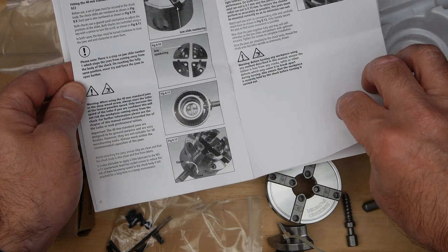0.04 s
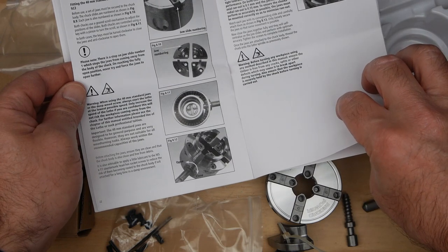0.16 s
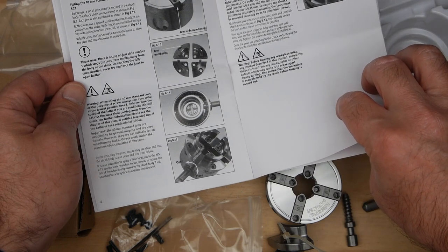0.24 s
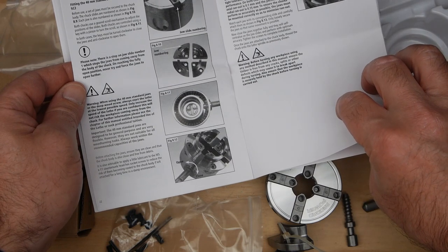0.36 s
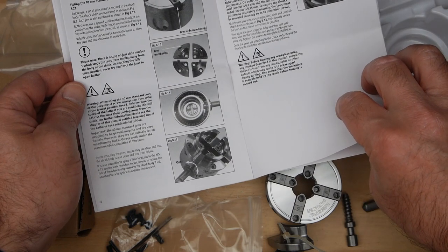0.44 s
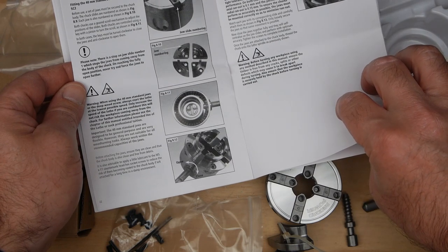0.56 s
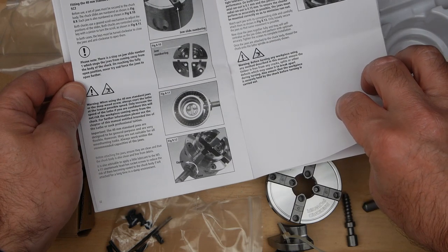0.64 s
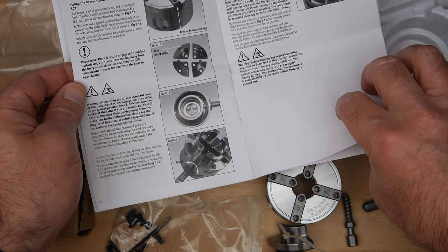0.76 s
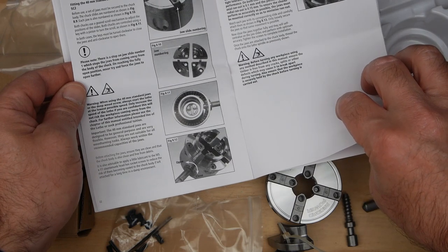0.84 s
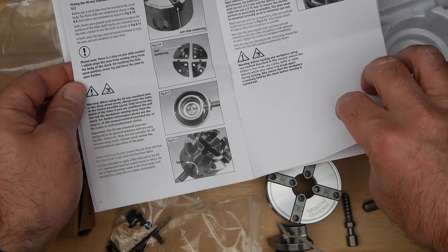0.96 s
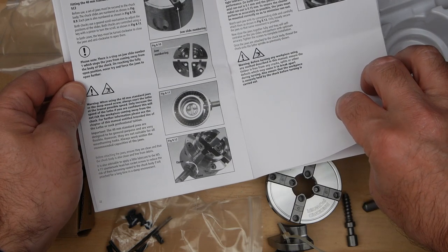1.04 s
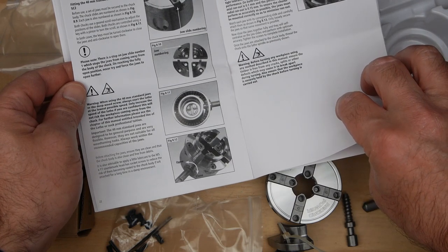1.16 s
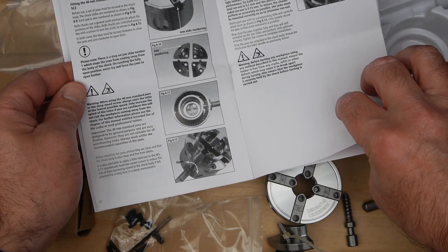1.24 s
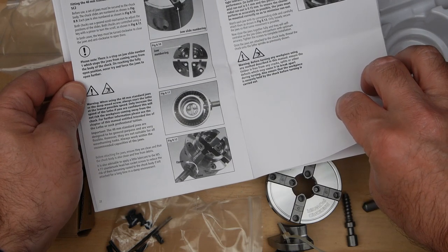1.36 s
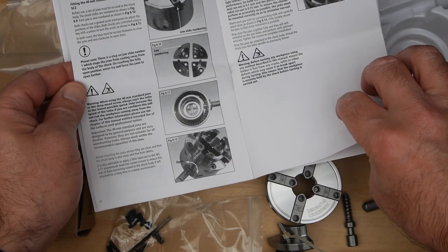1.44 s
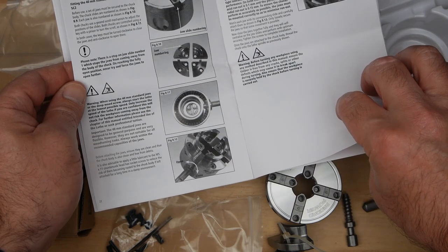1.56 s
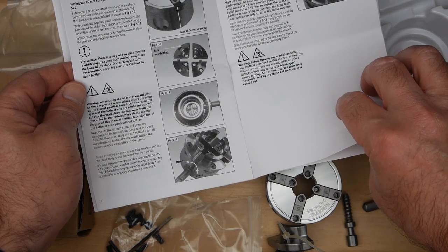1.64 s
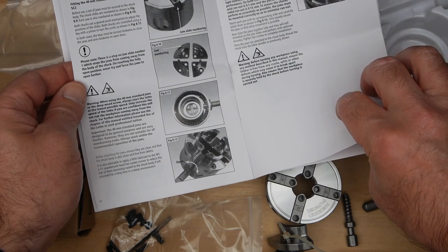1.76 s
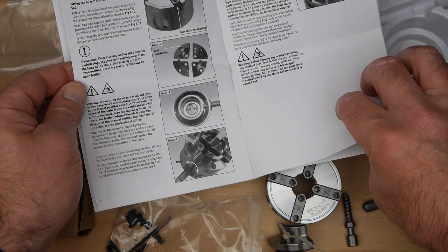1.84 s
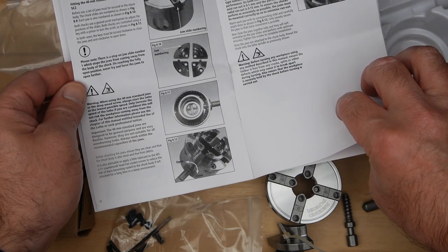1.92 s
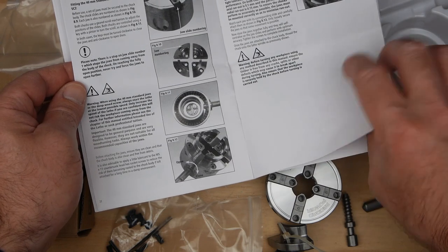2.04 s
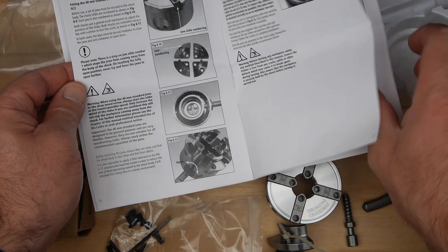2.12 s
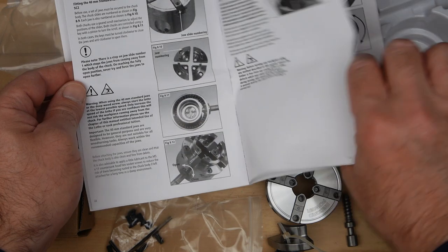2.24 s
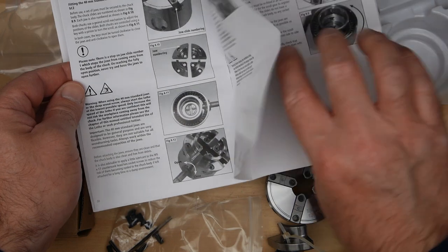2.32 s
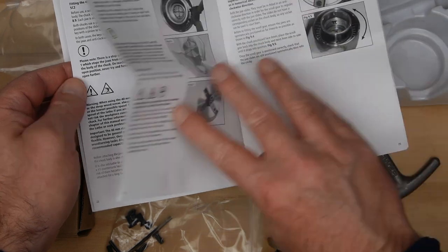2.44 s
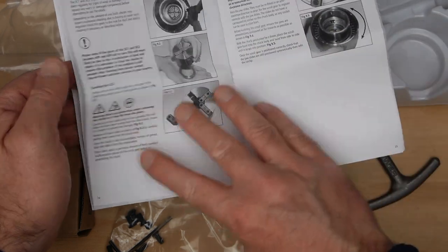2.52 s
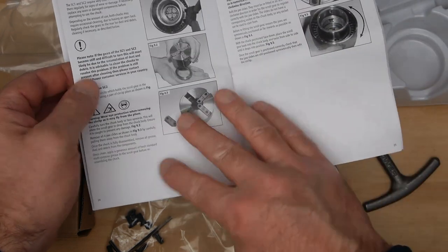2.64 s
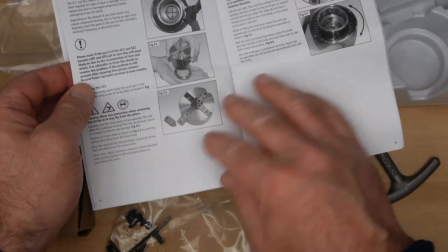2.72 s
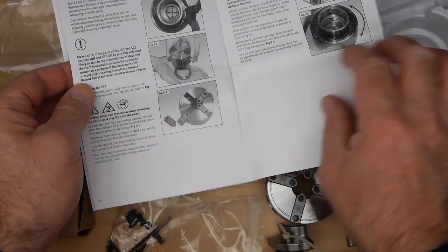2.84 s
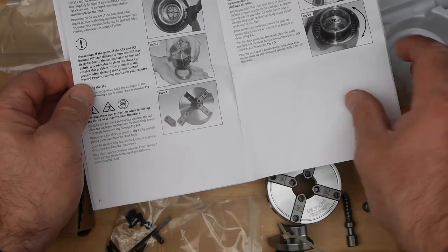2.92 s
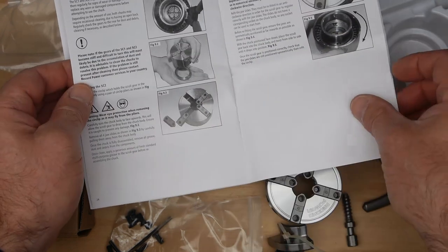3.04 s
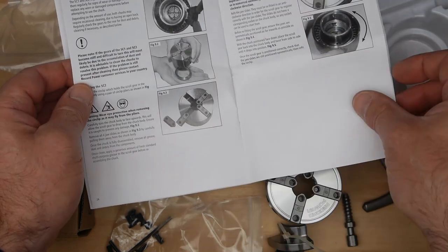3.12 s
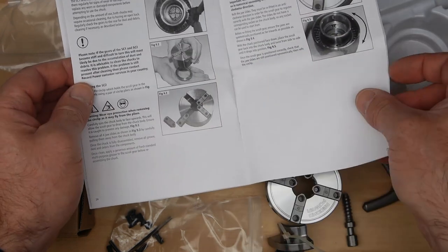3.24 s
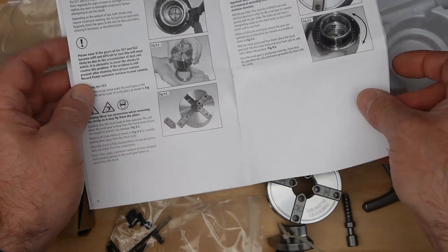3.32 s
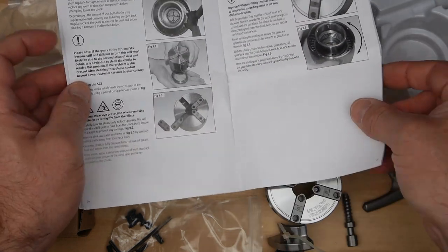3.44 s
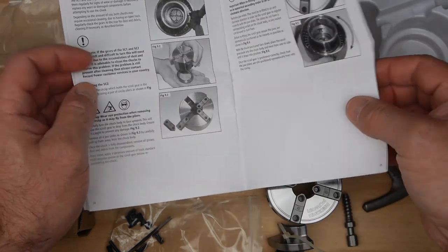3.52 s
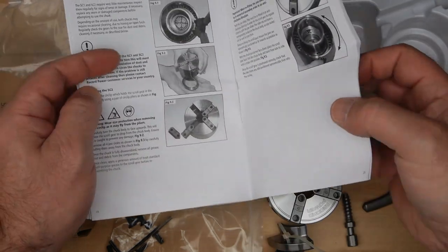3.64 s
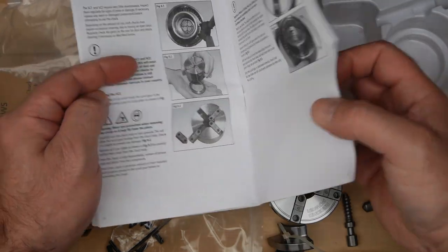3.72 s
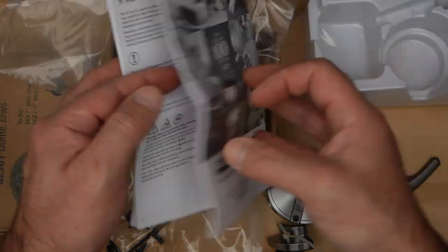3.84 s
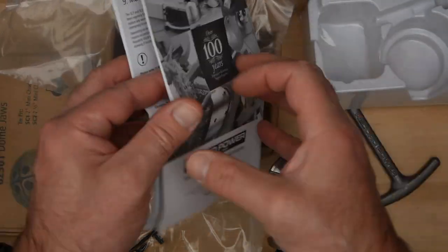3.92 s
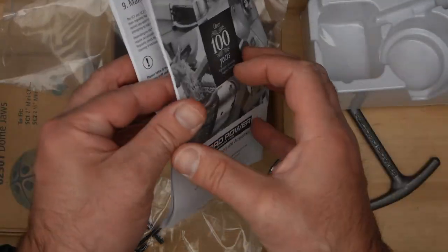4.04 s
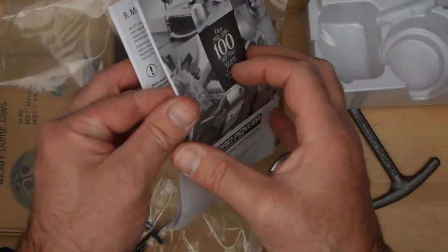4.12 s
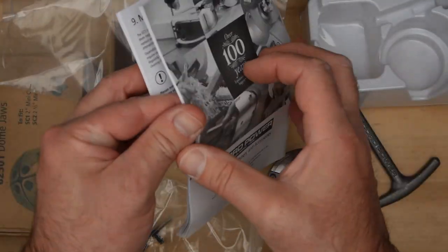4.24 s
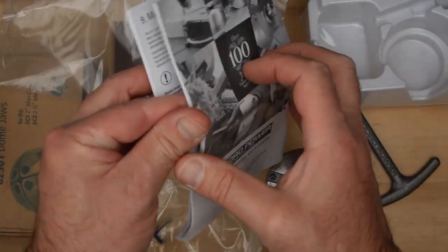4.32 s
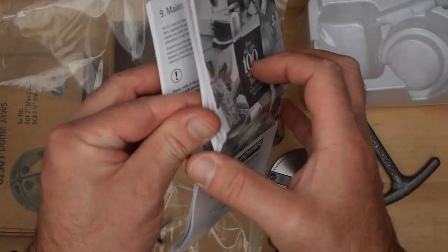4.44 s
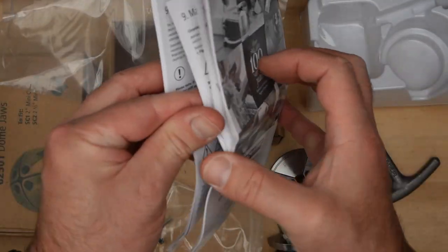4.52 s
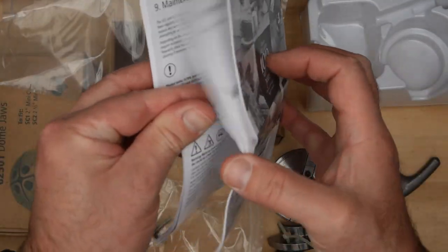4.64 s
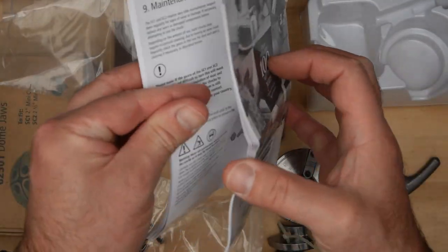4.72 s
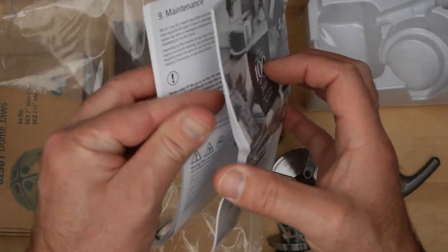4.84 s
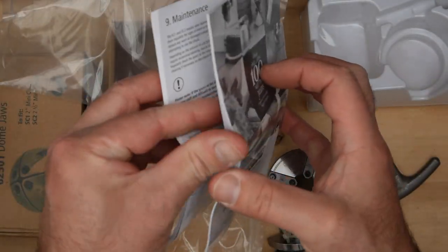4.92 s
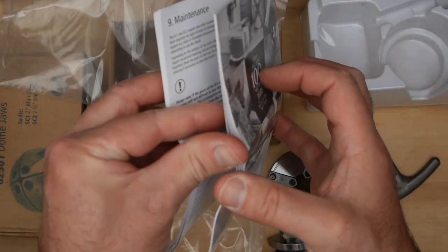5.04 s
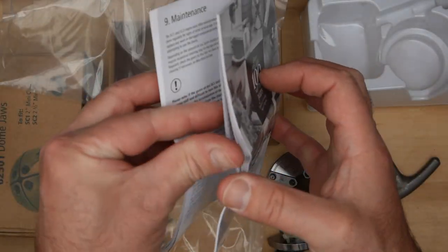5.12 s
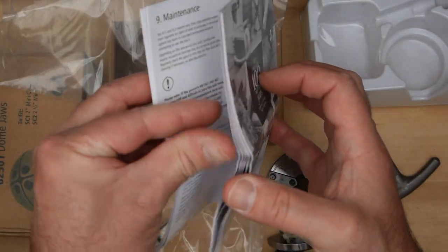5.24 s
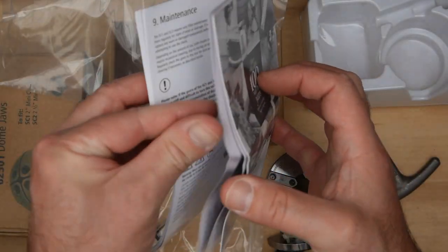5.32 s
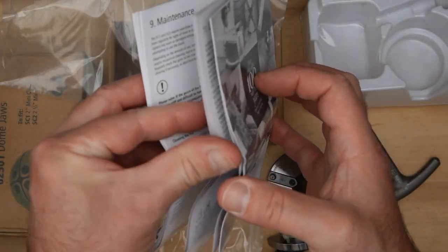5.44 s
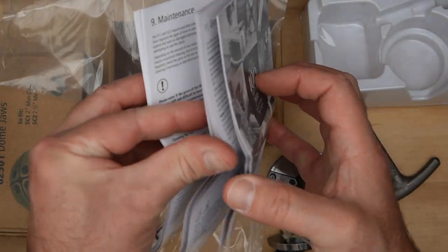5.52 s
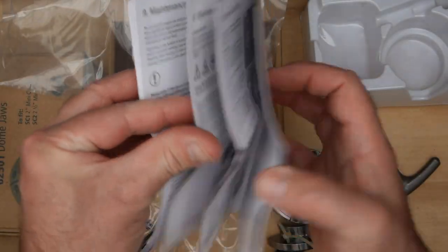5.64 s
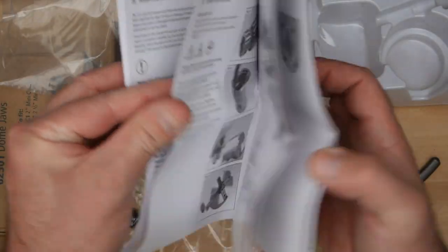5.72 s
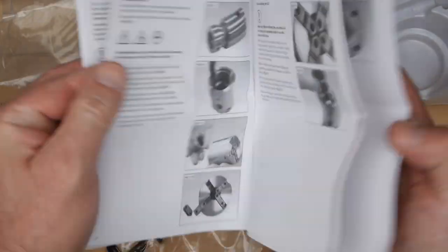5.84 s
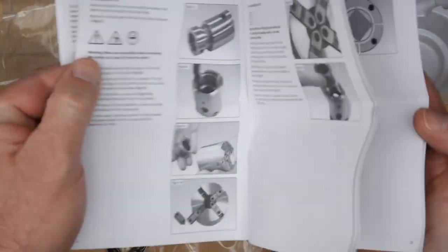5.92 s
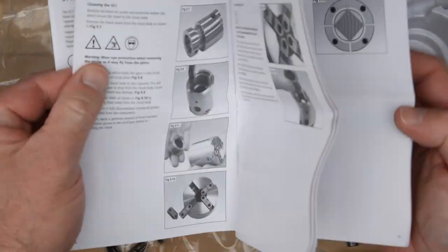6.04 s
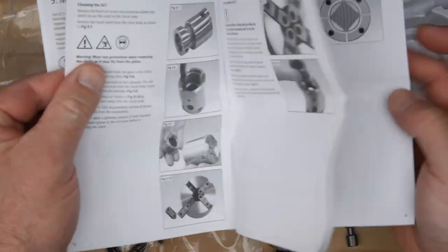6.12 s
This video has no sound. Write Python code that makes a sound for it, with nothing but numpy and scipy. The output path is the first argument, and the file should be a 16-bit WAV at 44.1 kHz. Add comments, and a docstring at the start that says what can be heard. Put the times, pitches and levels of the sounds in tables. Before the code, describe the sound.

Quiet indoor hum and air; a thin booklet's page snaps over loudly, fingers brush it, pages close and riffle softly, ending in a sharp flick.

```python
"""A mains hum, steady air noise and a faint fluttering whine come first; after two seconds the paper starts.
In a small, quiet room two hands leaf through a paper booklet over a workbench.
One page is swung over and smoothed down, fingers slide to the edge, the booklet is shut, riffled and opened.
Creases are filtered kicks and bursts; edges, skin and bending are random grains shaped by hand strokes.
The microphone gets the paper directly and by way of bench and walls, in stereo, with a notch in the treble."""
import sys
import numpy as np
from scipy import signal
from scipy.fft import rfft, irfft
from scipy.io import wavfile
from scipy.ndimage import uniform_filter1d

SR = 44100
rng = np.random.default_rng(int(sys.argv[2]) if len(sys.argv) > 2 else 0)


def put_to_file(sound):
    """Save the sound as 16-bit audio at rate SR, in the file named by the first command-line argument."""
    columns = np.atleast_2d(sound).T  # one column per channel
    safe = np.clip(columns, -1, 1)
    whole_steps = np.round(safe * 32767)
    wavfile.write(sys.argv[1], SR, whole_steps.astype(np.int16))


N = 272538
TIME = np.arange(N) / SR
HZ = np.arange(2049) * SR / 4096  # the frequencies at which every filter gain is given


# A sheet buckles or an edge flicks free: (time [s], relative level [dB], low flex [dB re level],
# high crack [dB re level], ring [Hz], rise [s])
SNAPS = [(2.239, -28.5, -5, -32, 1530, 0.0034), (2.303, -60, 16, 9, 894, 0.0077),
         (2.331, -40.5, 7.5, 3.5, 566, 0.0056), (2.348, -24, -5, -14.5, 3420, 0.00098),
         (2.362, -27.5, -26, -26, 1260, 0.0036), (2.391, -28, -14, -23, 860, 0),
         (2.398, -22.5, -3.5, -24, 1940, .003), (2.404, -28, 2, -6.5, 920, 0.0012),
         (2.420, -23.5, 4, -12, 1500, 0.0029), (2.431, -23, -6.5, -7, 6100, 0.0018),
         (2.4341, -30, -12, -25, 1280, .0003), (2.485, -38, 5, -7, 1290, 0.0026),
         (2.528, -37, 2, -10, 1830, 0.0016), (2.621, -43, 5.5, 2.5, 520, 0.0025),
         (2.655, -51, 3.5, 9.5, 6440, 0.001), (2.755, -45, -4.5, 0.5, 2000, 0.0018),
         (2.932, -65, 5, 9.5, 1590, 0.0045), (3.040, -59, 4, -2, 1660, 0.0024),
         (3.3, -53.5, 18.5, 1.5, 880, 0.0016), (3.405, -54.5, 6, -2, 520, 0.0074),
         (3.443, -58, 14, 0.5, 464, 0.0033), (3.568, -54, 15.5, -19, 760, 0.0026),
         (3.747, -66, 24.5, -3, 570, 0.0037), (3.911, -52, -7, 9.5, 2930, 0.00014),
         (3.922, -45, 3.5, 2.5, 3350, .0015), (3.989, -44, -1, -6.5, 1640, 0.0025),
         (4.014, -41.5, -3, -15, 1600, 0.0018), (4.07, -46, -14, -21, 1560, .001),
         (4.086, -48.5, -4, -9, 3600, 0.000081), (4.179, -53.5, -1, -2, 1610, 0.0028),
         (4.2304, -47.5, -7.5, -22, 1560, 0.00063), (4.2763, -51, 2.5, -22, 1520, 0.000049),
         (4.449, -52, -7, -2, 2230, 0.0065), (4.482, -50, -15, -7, 2050, 0.0023),
         (4.539, -57.5, 9.5, -14, 2080, 0.003), (4.578, -44, -6, -28, 1980, 0.0026),
         (4.611, -46, 3.5, 8.5, 4840, 0.00081), (4.644, -60.5, 7, 22, 4680, 0.0012),
         (4.671, -42, -1.5, -10, 2580, 0.005), (4.753, -36, -30, -19, 2570, .004),
         (4.765, -38, -14, 2.5, 7200, 0.0031), (5.153, -50, -9.5, -26, 1290, 0),
         (5.224, -57, -3, 8, 2150, .0013), (5.2621, -50.5, 4, 8, 6100, 0.0017),
         (5.735, -59.5, -2, -4.5, 2570, 0.00007), (5.869, -56.5, -14, 6, 2800, 0.0033),
         (5.919, -40, -23, 6, 2570, 0.0036), (5.9698, -56.5, -5, 10.5, 2393, 0.0023),
         (6.002, -44, -1, 0.5, 2430, 0.0026), (6.060, -67, 8, 13, 4100, 0),
         (6.105, -27.5, -35, -31, 4400, 0.00039), (6.1109, -30, -6.5, -40, 2100, 0.0023),
         (6.1191, -32, 0.5, -42, 1420, .0035)]


def snaps(level_db=24, flex_db=-1, crack_db=0, ring_width=0.19, chatter=1.0, kick_s=0.0042):
    """A crease pops through with one kick and chatters briefly; a slow release is a swish without the kick."""
    out = np.zeros(N)
    t = np.arange(4096) / SR
    flex_band = resonance(HZ, 523, 1070) ** 2
    body_band = resonance(HZ, 2060, 3260) ** 3
    crack_band = resonance(HZ, 5000, 9400) ** 3
    sheet = sheet_gain() / np.hypot(1, (HZ / 8470) ** 4)
    for s, db, flex, crack, ring_hz, rise_s in SNAPS:
        # smaller snaps, and dull ones with little crack, ring more purely
        ring_db = 9.5 + 0.12 * (-25 - db) + 0.11 * np.clip(-crack, 0, 20)
        # the size of the patch that pops decides where it rings
        ring_peak = resonance(HZ, ring_hz, ring_width * ring_hz) ** 2
        ring = sheet * (1 + (undb(ring_db) - 1) * ring_peak)
        levels = undb(db) * undb([flex + flex_db, 0, crack + crack_db])
        bands = [flex_band, body_band, crack_band]
        gain = np.sqrt(sum((g * unit(band * ring)) ** 2 for g, band in zip(levels, bands)))

        # a crease that lets go slowly also chatters longer; the fade time is to -60 dB
        fade_s = max(0.014 + 4.1 * rise_s, .002)
        onset = np.minimum((t + 1 / SR) / max(rise_s, 1 / SR), 1)
        fade = np.exp(-np.log(1000) * np.maximum(t - 2 * rise_s, 0) / fade_s)
        push = rng.standard_normal(len(t)) * onset * fade
        push *= chatter / np.linalg.norm(push)
        push[0] = rng.choice([-1, 1]) * np.exp(-rise_s / kick_s)  # the kick
        add(out, s, undb(level_db) * shape(push / np.linalg.norm(push), gain))
    return out


# The whole bundle of pages bumps against the hands: (time [s], peak level [dB], pitch [Hz])
BUMPS = [(2.310, -36.5, 197), (2.345, -39, 350), (2.412, -42, 130), (2.44, -28.5, 340), (3.107, -42.5, 454),
         (3.957, -32.5, 327), (3.97, -40, 260), (4.004, -40.5, 148), (4.019, -35, 300), (4.177, -43.5, 270),
         (4.753, -51, 430), (6.12, -45.5, 170)]


def bumps(fade_s=0.038, breadth=1.47):
    """Soft, heavily damped thuds of the whole bundle: fading noise in a broad resonance."""
    out = np.zeros(N)
    t = np.arange(4096) / SR
    # the deepest bass is kept out of the thuds
    low_cut = 1 / np.hypot(1, (80 / (HZ + 1)) ** 3)
    for s, db, hz in BUMPS:
        push = rng.standard_normal(len(t)) * np.exp(-np.log(1000) * t / fade_s)
        thud = shape(push, resonance(HZ, hz, breadth * hz) ** 3 * low_cut)
        add(out, s, undb(db) * thud / abs(thud).max())
    return out


# Paper slides on paper: (time of fastest moment [s], level [dB], swell [s], fade [s])
# 2.2-2.7 s page turned and smoothed, to 4.1 s booklet shut, 4.4-4.8 s first riffle,
# 5.1-5.5 s second riffle, from 5.9 s opened again
SLIDES = [(2.235, -52, 0.083, 0.071), (2.41, -35, 0.069, 0.069), (2.53, -51.5, 0.16, 0.23),
          (2.65, -46.5, 0.12, 0.048), (2.79, -60.5, 0.099, 0.11), (3.92, -51, 0.16, 0.19),
          (4.06, -52.5, 0.2, 0.3), (4.48, -48.5, 0.052, 0.055), (4.68, -45.5, 0.16, 0.21),
          (4.76, -42.5, .075, 0.063), (5.13, -59.5, 0.17, 0.19), (5.28, -52, 0.093, 0.16),
          (5.45, -60.5, .07, 0.11), (5.95, -51.5, 0.2, 0.31), (6.13, -52.5, 0.095, 0.18)]
# Colour of the scrape: (frequency [Hz], relative level [dB])
SLIDE_COLOUR = [(100, -34), (250, -7.5), (420, 4.5), (600, -5.5), (1250, -0.5), (1800, -2.5), (2500, -1),
                (3600, -2.5), (5500, -7), (7000, -2), (8400, -11), (11500, -15), (15000, -39)]


def slide(flutter_db=2, dull_hz=8000, loud_db=-33):
    """Page edges scrape over each other in a fine, uneven hiss; pressed hard, they lose the finest treble."""
    under_finger = undb(-5.5) * strokes(RUBS)  # a dragging finger also shifts the sheet on the one below
    speed = np.hypot(strokes(SLIDES), under_finger)
    slips = grains(rate=4000, spread_db=-2.0) * undb(flutter_db * walk(rate=150))
    hiss = unit(shape(slips, colour(SLIDE_COLOUR, HZ))) * speed
    pressure = np.minimum(speed / undb(loud_db), 1) ** 2
    dulled = shape(hiss * pressure, 1 / np.hypot(1, (HZ / dull_hz) ** 3))
    return hiss * (1 - pressure) + dulled


# A page is bent: (time of hardest moment [s], relative level [dB], swell [s], fade [s])
BENDS = [(2.24, -37, 0.017, 0.054), (2.362, -28.5, .04, 0.026), (2.402, -26.5, 0.018, 0.057),
         (2.435, -26.5, 0.044, 0.05), (2.49, -45, 0.071, 0.21), (4.025, -53, 0.075, 0.2)]
# Colour of the small buckles: (frequency [Hz], relative level [dB])
BEND_COLOUR = [(50, -23), (160, 0), (240, 2.5), (350, -4.5), (530, 7), (1150, 5.5), (1650, -1.5),
               (2200, -4.5), (3300, -1), (4500, -23), (6500, -14), (8500, -48), (15000, -49)]


def crinkle(level_db=-2.0):
    """The bent page gives way in a run of small buckles."""
    buckles = grains(rate=380, spread_db=0.0)
    crackle = unit(shape(buckles, colour(BEND_COLOUR, HZ) * sheet_gain()))
    return crackle * strokes(BENDS) * undb(level_db)


# A fingertip drags over the sheet: (time of fastest moment [s], level [dB], swell [s], fade [s])
RUBS = [(2.96, -61.5, 0.14, 0.2), (3.115, -55, 0.11, 0.15), (3.32, -55.5, 0.13, 0.27),
        (3.515, -46.5, 0.068, 0.1), (3.57, -48.5, 0.13, 0.14), (3.70, -57, .04, 0.075),
        (4.09, -52.5, 0.12, 0.12)]
# Colour of skin on the sheet: (frequency [Hz], relative level [dB])
RUB_COLOUR = [(60, -46), (200, -12.5), (350, -11), (520, -0.5), (640, -8.5), (780, -5.5), (1150, -17.5),
              (1550, -13), (2800, -25.5), (7000, -55)]


def rub(flutter_db=1.5):
    """Skin sticks and slips, and the sheet sounds like a soft drumhead."""
    slips = grains(rate=3000, spread_db=-1.0) * undb(flutter_db * walk(rate=120))
    return unit(shape(slips, colour(RUB_COLOUR, HZ))) * strokes(RUBS)


# A page slips out and the gap behind it widens:
# (time of fastest moment [s], relative level [dB], swell [s], fade [s])
GAPS = [(4.74, -54, 0.074, 0.07), (5.915, -53.5, 0.11, 0.17)]


def gap(centre_hz=2585, fall_oct_per_s=2.3, width_hz=320, level_db=-1):
    """The scrape rings in the air between two pages; the pitch falls as they part."""
    fastest = np.array(GAPS)[:, 0]
    nearest = np.argmin(abs(TIME - fastest[:, None]), axis=0)
    since = TIME - fastest[nearest]
    hz = centre_hz * 2 ** (-fall_oct_per_s * np.clip(since, -.5, .5))
    phase = 2 * np.pi * np.cumsum(hz) / SR
    # two slow noises on a gliding carrier make a gliding band of noise
    low_pass = 1 / (1 + (HZ / width_hz) ** 2)
    in_phase = unit(shape(grains(rate=2200, spread_db=4), low_pass))
    quadrature = unit(shape(grains(rate=2200, spread_db=4), low_pass))
    ringing = unit(in_phase * np.cos(phase) + quadrature * np.sin(phase))
    return ringing * undb(level_db) * strokes(GAPS)


# Ringing of an open sheet: (frequency [Hz], width [Hz], level [dB, halved when played])
SHEET = [(350, 24, -5), (544, 140, -1), (904, 44, -1), (1160, 22, -3), (1290, 27, -2), (1560, 100, 0),
         (1920, 53, -4), (2310, 69, -7)]


def sheet_gain(between_db=-4):
    """The sheet's resonances over a broad base."""
    peaks = sum((undb(db / 2) * resonance(HZ, f, w)) ** 2 for f, w, db in SHEET)
    return np.sqrt(peaks + undb(between_db) ** 2)


def paper():
    """Everything that the booklet does, heard in the room."""
    return room(snaps() + bumps() + slide() + gap() + rub() + crinkle())


# Stereo width of the paper, side minus mid: (frequency [Hz], level [dB])
PAPER_SIDE = [(100, -25), (400, -16), (2300, -17.5), (4400, -8.5), (8000, -5), (14000, -1.5)]
# Stereo balance of the paper, left minus right: (frequency [Hz], level [dB])
BALANCE = [(100, -1), (2400, 0), (4400, 0), (6000, 4.5), (8000, -0.5), (13000, -8)]


def spread(mid):
    """Each crackle comes from another spot on the wide sheet; the treble shows this most."""
    place = unit(np.sin(2 * walk(rate=300)))
    side = shape(mid * place, colour(PAPER_SIDE, HZ))
    lean = np.sqrt(colour(BALANCE, HZ))

    def even(x, gain):
        """Filter without phase shift."""
        return signal.fftconvolve(x, np.roll(irfft(gain), len(gain) - 1), "same")

    return np.array([even(mid + side, lean), even(mid - side, 1 / lean)])


def room(x, early_db=-8, early_s=0.11, late_db=-8, t60_s=0.42, dull_hz=2800):
    """Quick reflections off the bench and the things on it, then a duller tail from the walls."""
    t = np.arange(SR) / SR
    soft = 1 / np.hypot(1, HZ / dull_hz)
    early = (early_db, early_s, .003, np.sqrt(soft))
    late = (late_db, t60_s, .012, soft)
    response = 0
    for db, t60, delay_s, gain in (early, late):
        echoes = rng.standard_normal(SR) * np.exp(-np.log(1000) * t / t60) * (t > delay_s)
        response = response + undb(db) * shape(echoes / np.linalg.norm(echoes), gain)
    return x + signal.fftconvolve(x, response)[:N]


# Colour of the air noise: (frequency [Hz], relative level [dB])
AIR_COLOUR = [(25, -42), (65, -21), (120, -7), (200, -10), (330, -14.5), (520, -18.5), (1200, -20.5),
              (2500, -23), (4000, -27), (7000, -29.5), (10000, -33), (13000, -42.5), (15000, -47)]
# Stereo width of the air noise, side minus mid: (frequency [Hz], level [dB])
AIR_SIDE = [(100, -8.5), (380, -1), (700, 0), (1300, -8), (2400, -6), (4400, -4.5), (12000, -3)]


def air_noise(level_db=-64):
    """Steady wide noise of the air in the room."""
    gain = colour(AIR_COLOUR, HZ)
    mid = shape(rng.standard_normal(N), gain)
    side = shape(rng.standard_normal(N), gain * colour(AIR_SIDE, HZ))
    return undb(level_db) / np.std(mid) * np.array([mid + side, mid - side])


# Mains hum: (frequency [Hz], relative rms level [dB])
HUM = [(50, -74), (100, -66), (150, -71), (200, -72.5), (250, -75), (300, -75.5), (350, -78.5),
       (450, -82.5)]


def mains_hum(level_db=-2):
    """Steady sines at multiples of the mains frequency, each from a random phase."""
    hum = np.zeros(N)
    for hz, db in HUM:
        hum += undb(db + level_db) * np.sqrt(2) * np.sin(2 * np.pi * (hz * TIME + rng.random()))
    return hum


def whine(level_db=-71.5, centre_hz=2860, width_hz=210):
    """A thin whine: a narrow band of noise whose level flutters."""
    band = unit(shape(rng.standard_normal(N), resonance(HZ, centre_hz, width_hz) ** 2))
    flutter = unit(1 + .6 * np.tanh(1.5 * walk(rate=40)))
    return band * flutter * undb(level_db)


def room_tone():
    """Wide air noise, with hum and whine in the middle."""
    return air_noise() + mains_hum() + whine()


def strokes(rows, stroke_db=20, roundness=1.26):
    """A hand stroke swells and dies away, by stroke_db over each of its times; overlapping powers add."""
    power = 0
    for s, db, swell_s, fade_s in rows:
        away = np.maximum((s - TIME) / swell_s, (TIME - s) / fade_s)
        # roundness over 1: rounder at its top, and it stops sooner
        fall_db = stroke_db * np.minimum(away, 10) ** roundness
        power = power + undb(db - fall_db) ** 2
    return np.sqrt(power)


def grains(rate, spread_db):
    """Tiny slips at random moments, rate per second; a positive spread makes a few far stronger, 0 all equal."""
    size = undb(spread_db * np.minimum(rng.exponential(size=N), 4))
    return unit((rng.random(N) < rate / SR) * rng.choice([-1, 1], N) * size)


def walk(rate):
    """Random levels, rate per second, joined by straight slopes; rms 1."""
    k = int(SR / rate)
    steps = np.repeat(rng.standard_normal(N // k + 1), k)
    return unit(uniform_filter1d(steps, k)[:N])


def undb(db):
    """Decibels to gain."""
    return 10 ** (np.asarray(db) / 20)


def unit(x):
    """Scale to rms 1."""
    return x / np.sqrt(np.mean(x ** 2))


def colour(points, hz):
    """Gain of a (frequency, level) table at the given frequencies."""
    f, db = np.transpose(points)
    return undb(np.interp(np.log(hz + 1), np.log(f), db))


def resonance(hz, centre_hz, width_hz):
    """Gain of a band-pass, 1 at its centre."""
    return 1 / np.sqrt(1 + ((hz ** 2 - centre_hz ** 2) / ((hz + 1) * width_hz)) ** 2)


def causal(gain):
    """The most compact impulse response that has this gain (minimum phase, by folding the cepstrum)."""
    cepstrum = irfft(np.log(gain + 1e-7))
    half = len(cepstrum) // 2
    cepstrum[1:half] *= 2
    cepstrum[half + 1:] = 0
    return irfft(np.exp(rfft(cepstrum)))


def shape(x, gain):
    """Filter by a gain given at the frequencies HZ."""
    return signal.fftconvolve(x, causal(gain))[:len(x)]


def add(track, s, sound):
    """Mix a sound in from time s."""
    start = int(s * SR)
    track[start:start + len(sound)] += sound[:N - start]


def scene():
    """The booklet in front of the room tone."""
    return spread(paper()) + room_tone()


def record(dry, notch_hz=7900, top_hz=15200):
    """The microphone has a narrow notch in the treble; the top is cut."""
    notched = signal.lfilter(*signal.iirnotch(notch_hz, 30, fs=SR), dry)
    top_cut = signal.ellip(8, .2, 70, top_hz, fs=SR, output="sos")
    return signal.sosfilt(top_cut, notched)


dry = scene()
out = record(dry)
put_to_file(out)
```